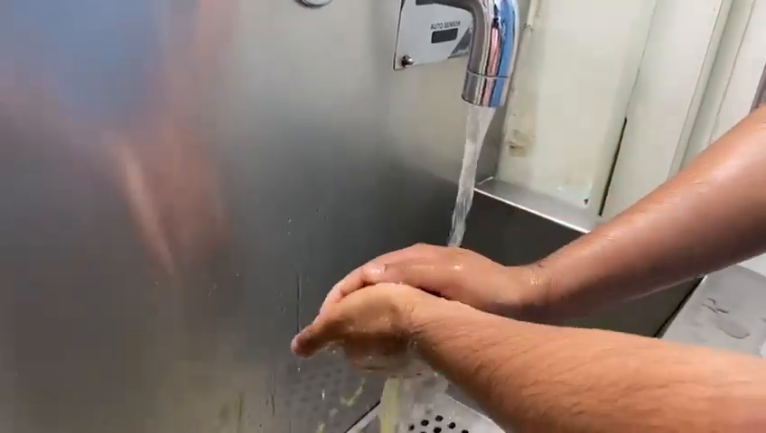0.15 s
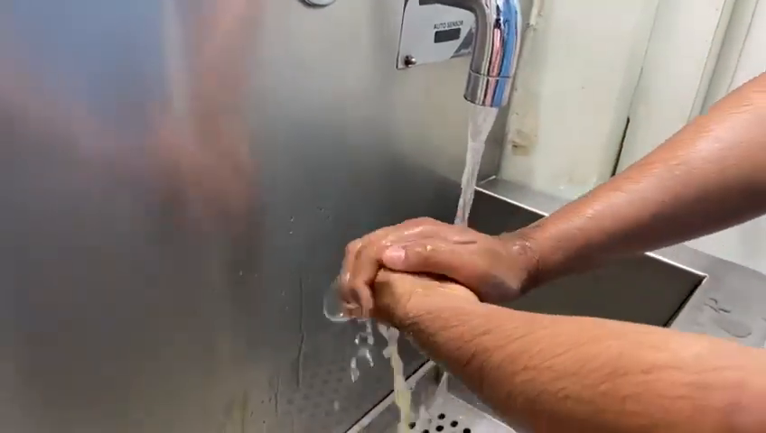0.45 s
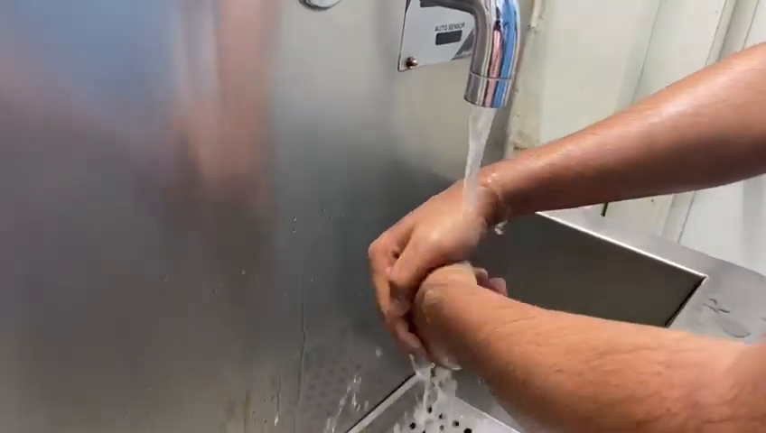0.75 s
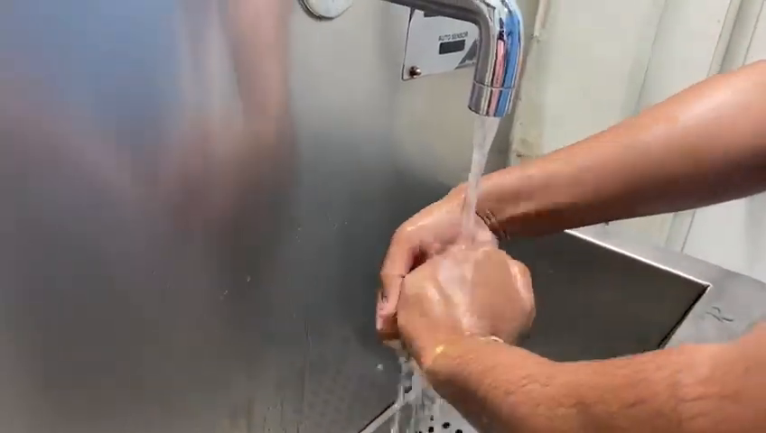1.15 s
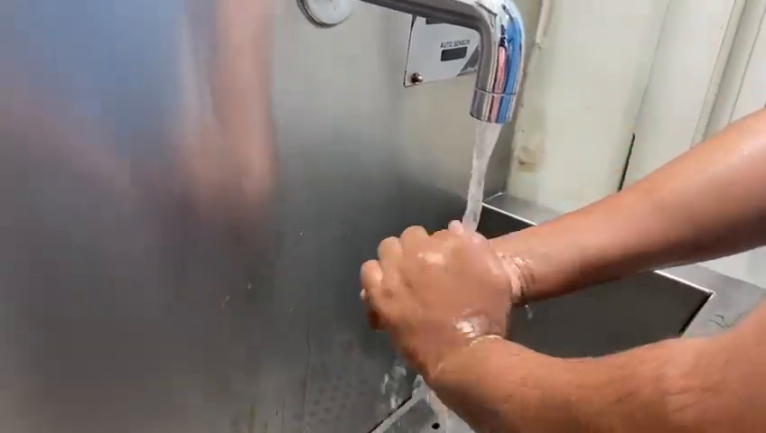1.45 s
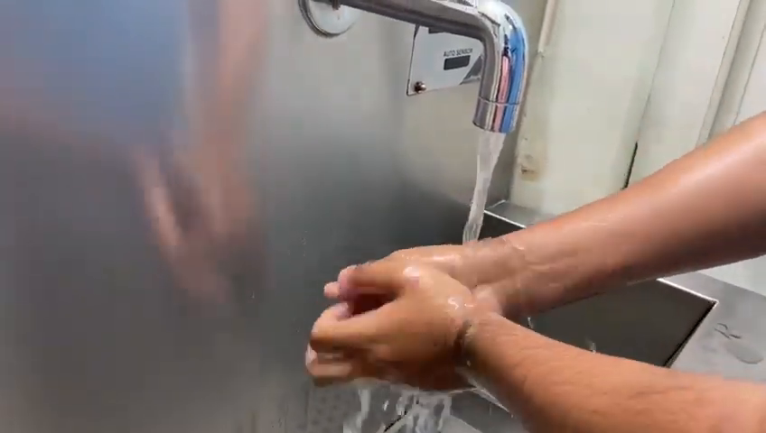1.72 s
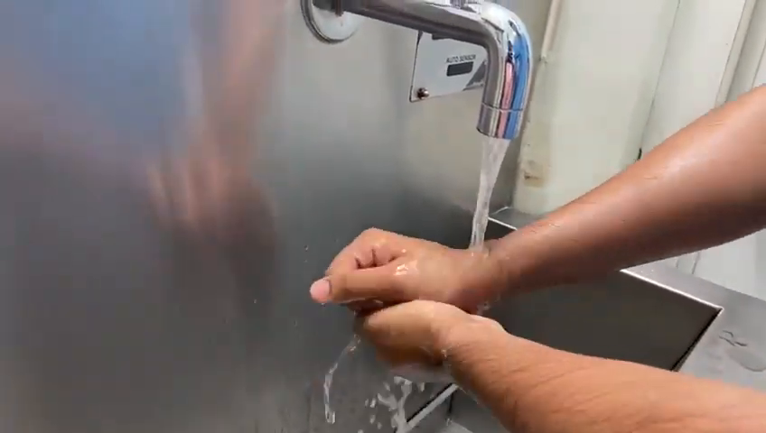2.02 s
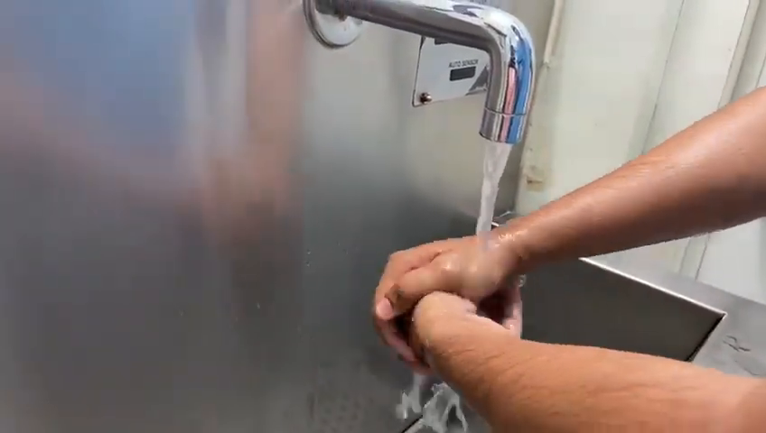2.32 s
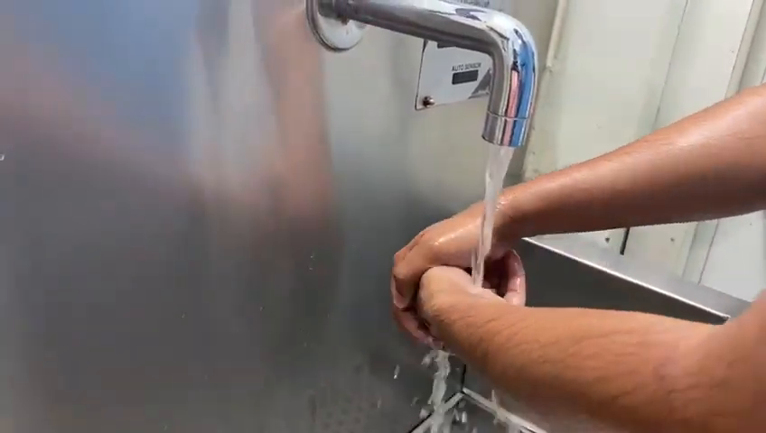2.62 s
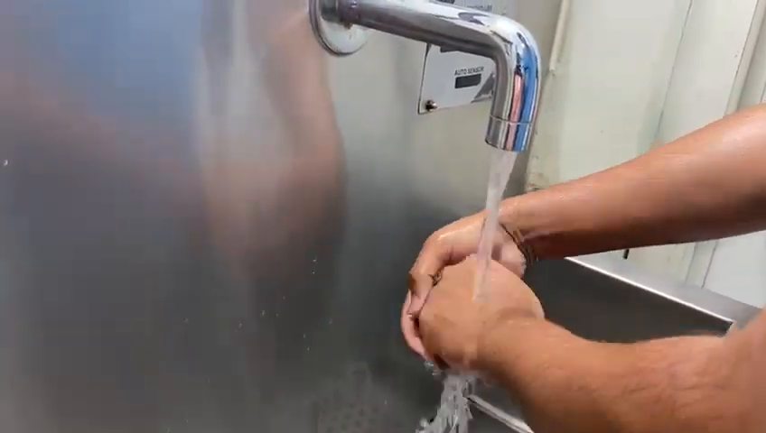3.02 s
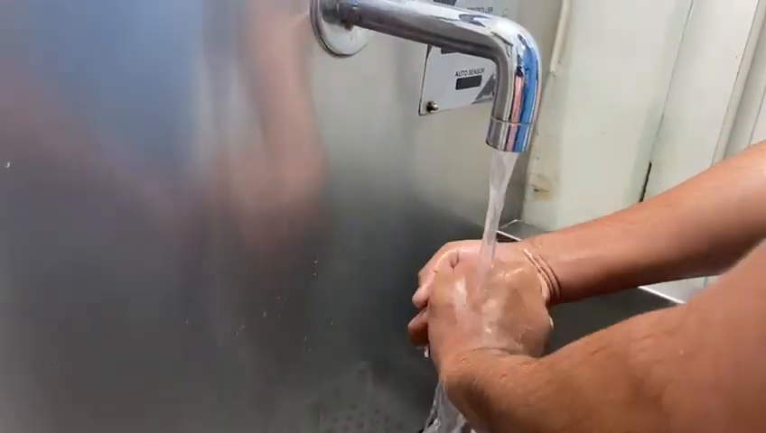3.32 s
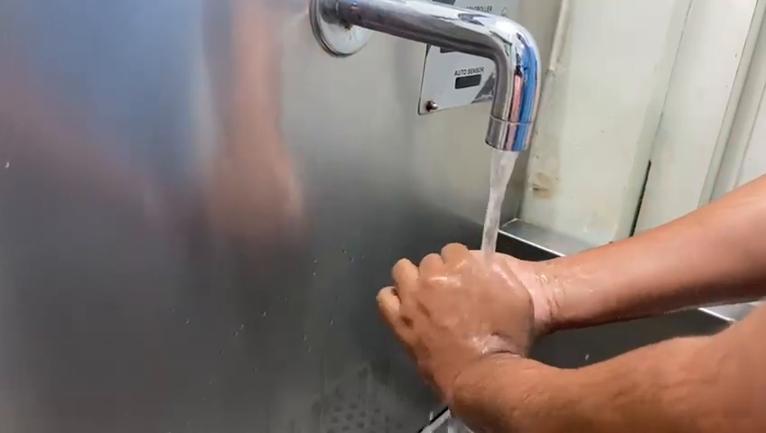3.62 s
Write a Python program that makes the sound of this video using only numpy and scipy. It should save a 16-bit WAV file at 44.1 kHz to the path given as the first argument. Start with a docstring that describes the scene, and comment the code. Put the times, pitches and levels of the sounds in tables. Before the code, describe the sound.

Running water hisses and splatters off washing hands into a low-humming metal basin indoors

```python
"""Tap water runs over rubbing hands and falls into a sheet-metal sink in a small hard room.
From the outset falling water drives the low basin modes into a hum, and noise bands give the hiss of spray.
Droplets tick and pop throughout as short resonances; from 0.04 s splashes off the hands add slap,
crackle and rising bubbles, the strongest near 1.76 s and the last near 3.7 s. The walls return droplets and
splashes as one echo and a diffuse tail; the sum is heard in stereo, one treble band almost only at the sides."""
import sys
import numpy as np
from scipy import signal
from scipy.fft import next_fast_len
from scipy.io import wavfile
from scipy.ndimage import uniform_filter1d

SR = 44100
rng = np.random.default_rng(int(sys.argv[2]) if len(sys.argv) > 2 else 0)


def unload_audio(sound):
    """Save the sound as a 16-bit wav file, at the path given as the first command line argument."""
    columns = np.transpose(np.atleast_2d(sound))
    # keep every value between -1 and 1, then stretch to whole-number steps
    steps = np.round(np.clip(columns, -1, 1) * 32767)
    wavfile.write(sys.argv[1], SR, steps.astype(np.int16))


N = 165816

# Water drumming the basin; mode groups shift as the landing spot moves: [t/s, drum level/dB, then
# level/dB relative to the drum for modes below 82 Hz, at 82-100 Hz, at 100-165 Hz and above 600 Hz]
DRUMMING = [(0.0, -32.5, -9, -14, 0, -6), (0.07, -29, -7, -14, -4, -25), (0.14, -32.5, -19, -1, -9.5, -15),
            (0.32, -26, -10, -8, -3.5, -17), (0.42, -29.5, -14, -16, -4, -13),
            (0.6, -26.5, -11, -11, -4.5, -9.5), (0.76, -28, -22, 3, -5.5, -13.5),
            (0.92, -29, -9, 0, -1, -11.5), (0.98, -34.5, -19, 7.5, 4.5, -4.5),
            (1.16, -28.5, -15, -3.5, -8, -15), (1.26, -32, -21, 0, -10, -24),
            (1.38, -35.5, -5.5, 1, -6.5, -9), (1.75, -33, -7.5, -4, 1.5, -9.5),
            (1.88, -29.5, -13, -15, -9, -16), (1.93, -35.5, -9, 2, 0, -9.5),
            (1.99, -28.5, -36, -38, -0.5, -14), (2.03, -30, -7, -2, -9, -12),
            (2.5, -31, -4.5, -4, 1.5, -10), (2.73, -28.5, -25, -8, -5.5, -12.5),
            (2.81, -30, -2, -4, -8, -13.5), (2.88, -30, -7, -2, -5, -5.5), (2.95, -29.5, -8, -15, 5, -12.5),
            (3.04, -30, -4, -39, 0, -7), (3.13, -28.5, -6, 4, -0.5, -8.5),
            (3.49, -30.5, -6, -15, -1.5, -10.5), (3.76, -31.5, -24, 2, -2.5, -15.5)]
# Modes near 330 Hz (290-380 Hz), which follow this instead of the drum level: [t/s, level/dB]
MIDDLE_MODES = [(0.0, -56), (0.03, -42), (0.16, -37.5), (0.58, -29), (0.86, -40.5), (0.87, -32.5),
                (1.42, -38.5), (1.51, -31), (1.56, -43.5), (1.89, -29.5), (1.93, -35.5), (2.78, -29),
                (2.85, -37), (3.06, -29.5), (3.69, -35), (3.76, -30)]
# Normal modes of the basin: [f/Hz, bandwidth/Hz, relative level/dB]
BASIN_MODES = [(76.03, 3.7, 12.5), (89.1, 5.4, 2.5), (135.3, 7.4, 6.5), (160.4, 3, 0.5), (182.3, 35, -14),
               (196.8, 12, -5), (234.6, 14, -4.5), (272.9, 8.1, -4), (320.3, 9.9, 1.5), (343.2, 9.8, 0.5),
               (361, 13.3, -7), (403.7, 33, -14.5), (453, 11.7, -9), (468, 55, -21.5), (500, 14.5, -16),
               (546, 14, -18), (626.7, 18.6, -6), (707, 81, -16), (874.6, 69, -12.5), (961, 23, -7),
               (1022, 32.5, -9), (1146, 52, -14), (1423, 60, -16), (1514, 67, -17), (1783, 20, -14.5)]
# Boundaries between the groups of modes: [f/Hz]
MODE_GROUP_EDGES = (82, 100, 165, 290, 380, 600)
# Spray thrown off as the hands turn, the reference for hiss and drops: [t/s, level/dB]
SPRAY_COURSE = [(0.0, -40.5), (0.47, -36.5), (0.58, -36), (0.7, -39), (0.83, -36.5), (0.94, -39),
                (1.13, -37), (1.36, -45.5), (1.48, -38), (1.81, -41), (2.15, -37), (2.71, -36.5),
                (2.84, -37), (3.09, -35), (3.33, -39.5), (3.51, -37), (3.76, -44)]
# Spectral density of the hiss, which also weights the drops: [f/Hz, relative level per Hz/dB]
SPRAY_SPECTRUM = [(30, 4), (55, 18.5), (110, -4), (250, 15), (500, 12.5), (800, 5.5), (1100, 1),
                  (1600, -9.5), (2400, -2.5), (4000, -2.5), (6300, -3), (8000, -3.5), (10500, -3.5),
                  (12500, -9)]
# Independent side noise of the hiss relative to its centre: [f/Hz, level/dB]
SPRAY_SIDE_SPECTRUM = [(30, -59), (150, -8), (400, -2.5), (800, 0.5), (1500, 6), (2500, -4), (4000, -25),
                       (5600, 2), (12500, -24)]
# Splashes off the hands: [t/s, reference level/dB, f/Hz, crackle decay time T60/s,
# left over right/dB, broad crackle relative to the reference level/dB]
HAND_SPLASHES = [(0.0441, -27.5, 2750, 0.12, 6, 1), (0.164, -28, 5430, 0.03, 3, -6),
                 (0.1941, -18, 2435, 0.06, 4.5, -6), (0.22, -22, 4130, 0.043, 12, -10),
                 (0.2305, -20.5, 3130, 0.05, 4, 1), (0.247, -30, 2580, 0.063, 4, 6),
                 (0.265, -27, 2600, 0.051, 5, 7), (0.341, -24.5, 5560, 0.15, 13, 1),
                 (0.353, -26.5, 2330, 0.062, 1, -5), (0.4762, -27, 2330, 0.052, -0.5, -10),
                 (0.4991, -19, 3360, 0.051, 7, -7), (0.5199, -20, 3930, 0.29, 4.5, 6.5),
                 (0.575, -30, 3840, 0.038, 3, 1), (0.604, -29, 2350, 0.04, 5, -16),
                 (0.6425, -31, 2380, 0.043, -1, 9), (0.6754, -25, 3680, 0.06, 4, -1),
                 (0.732, -32.5, 4100, 0.06, 5, 12), (0.7677, -25.5, 2600, 0.037, 6, 14.5),
                 (0.795, -31, 3650, 0.06, 20, -6), (0.8625, -22, 4000, 0.073, 5, 7),
                 (0.862, -25, 1516, 0.04, 2, 4), (0.88, -15.5, 7450, 0.033, -3, -12),
                 (0.9865, -13.5, 8540, 0.079, -4, -10), (1.0157, -34, 4860, 0.1, -1, 15),
                 (1.032, -24.5, 3000, 0.1, 6, 8), (1.295, -24, 2250, 0.064, 5, -0.5),
                 (1.295, -20, 3880, 0.11, 5, 8), (1.3398, -24, 4200, 0.21, 4, 7),
                 (1.351, -22, 6660, 0.056, 2, -6), (1.375, -23.5, 6900, 0.027, 4, -12),
                 (1.417, -18.5, 3560, 0.06, 2, -4.5), (1.442, -29, 4050, 0.04, 2, 9),
                 (1.453, -26.5, 7400, 0.05, -2, -4), (1.5257, -21.5, 3690, 0.039, -1, -3),
                 (1.584, -19, 3810, 0.04, 6, -1.5), (1.555, -30.5, 4550, 0.087, 7, 16.5),
                 (1.614, -28, 5470, 0.03, 2, -9), (1.67, -21.5, 4840, 0.076, 0, -2),
                 (1.7563, -8, 4080, 0.068, 7.5, 0), (1.766, -23, 4050, 0.07, -3, -2),
                 (1.7958, -15, 6000, 0.046, 9, -8), (1.8185, -26, 4050, 0.05, 2, -9),
                 (1.909, -30, 2780, 0.045, 5.5, -1), (1.9438, -26, 2320, 0.046, 5, 6),
                 (1.953, -18.5, 5120, 0.04, 2, 2), (2.0443, -24, 7300, 0.08, -2, 2),
                 (2.0648, -26.5, 3900, 0.064, 0, 8), (2.0969, -25.5, 2440, 0.047, 0.5, 13.5),
                 (2.249, -21, 6700, 0.074, 3, -13), (2.294, -27, 3500, 0.073, 7, -2),
                 (2.335, -27, 4850, 0.044, -1, 9), (2.368, -25.5, 7100, 0.043, 0, 6.5),
                 (2.386, -28.5, 3650, 0.081, 2.0, 13), (2.411, -28, 3130, 0.042, 10, 7),
                 (2.4327, -19.5, 3440, 0.051, 4, 4.5), (2.5272, -24, 4600, 0.036, -1, -27),
                 (2.6498, -15.5, 3920, 0.04, 3, 1.5), (2.6883, -19, 4670, 0.053, 3, -18),
                 (2.729, -23.5, 3920, 0.052, 4, 3), (2.806, -11.5, 4480, 0.045, 6.5, -1),
                 (2.8811, -17, 2210, 0.043, 7, 1.5), (2.889, -14.5, 2550, 0.062, 5, -4),
                 (2.903, -24, 2520, 0.083, 3, -20), (2.947, -20.5, 5850, 0.04, 5, 4.5),
                 (3.0043, -10.5, 5780, 0.026, -2, -3), (3.045, -30, 4270, 0.052, 2, 4),
                 (3.1105, -23, 4960, 0.017, 0, 2), (3.1232, -24, 5100, 0.017, 0.5, 0),
                 (3.1396, -19, 5350, 0.023, -3, 0), (3.1589, -20, 3820, 0.085, 5, 0),
                 (3.189, -15.5, 3570, 0.065, 1.5, -38), (3.2403, -21.5, 5100, 0.032, 5, 3),
                 (3.3673, -27.5, 4300, 0.092, 8.5, 7.5), (3.478, -22, 2820, 0.028, 2, -1),
                 (3.5672, -29, 6800, 0.037, 9, 13.5), (3.7031, -15.5, 4350, 0.1, 3, -4.5)]

# basin: each mode swells on its own; side share is halved at BASIN_SIDE_HZ and opens above it
BASIN_SWAY_DB, BASIN_SIDE_DB, BASIN_SIDE_HZ, BASIN_LEFT = 1.54, -7.5, 477, 0.41
# exponent of power smoothing that reduces the beating of modes below this frequency
HUM_EVEN, HUM_EVEN_HZ = 0.55, 400
# spray: offset from its course, flicker depth from 1500 Hz up, leftward share from 600 Hz up
SPRAY_OFFSET_DB, SPRAY_FLICKER_DB, SPRAY_LEFT = -4, 4, 0.1
# ringing drops, then drops that only tick: typical rate, offset from the spray course, quality factor
DROPS_PER_S, DROP_OFFSET_DB, DROP_Q = 450, -8.5, 36
TICKS_PER_S, TICK_OFFSET_DB, TICK_Q = 110, -9, 2.2
DROP_SPREAD_DB = 3.4
# splash noise: sharpness, impact rate, onset; crackle band in multiples of the splash frequency
SPLASH_Q, SPLASH_GRAINS_PER_S, SPLASH_ATTACK_S = 8.5, 6700, 0.0017
CRACKLE_LOW, CRACKLE_HIGH = 0.55, 2.63
# the slap dies fast; the crackle starts below it and goes on
SLAP_T60_S, TAIL_DB = 0.014, -8
# bubbles per splash, their level, cycles per 20 dB of decay, and log-frequency spread of the later ones
BUBBLES, BUBBLE_DB, BUBBLE_CYCLES, BUBBLE_SCATTER = 7, 4.5, 9.8, 0.238
# fractional rise in frequency per cycle, first and later; level of later bubbles against the first
FIRST_RISE, LATE_RISE, LATE_BUBBLE_DB = 0.039, 0.0177, -12.5
# diffuse tail, then the first echo off the far wall of the basin
ROOM_T60_S, ROOM_DB, WALL_CUT_HZ = 0.28, -5.5, 2100
WALL_ECHO_S, WALL_ECHO_DB = 0.0098, -10
# stereo: band heard at the sides, not the centre; low-pass of the other side sound; the two top cuts
SIDE_BAND_LOW_HZ, SIDE_BAND_HIGH_HZ, SIDE_FADES_HZ = 8115, 9790, 6100
ROLL_OFF_HZ, CUTOFF_HZ = 13000, 12680


def from_db(db):
    """Convert a level in decibels to an amplitude ratio."""
    return 10 ** (np.asarray(db) / 20)


def rms_one(x):
    """Normalise to unit root-mean-square amplitude."""
    return x / np.sqrt(np.mean(x ** 2) + 1e-20)


def at_hz(points, hz):
    """Interpolate a spectrum linearly in level on a logarithmic frequency axis."""
    f, level_db = np.array(points).T
    return np.interp(np.log(hz), np.log(f), level_db)


def in_time(rows):
    """Interpolate each column of a time table linearly, sample by sample."""
    s, *columns = np.transpose(rows)
    return [np.interp(np.arange(N) / SR, s, column) for column in columns]


def drift(rate_hz):
    """Low-pass noise: two equal poles at rate_hz leave a slow fluctuation of unit rms."""
    step = 40   # samples between computed values
    r = np.exp(-2 * np.pi * step * rate_hz / SR)
    noise = rng.standard_normal(N // step + 2002)
    slow = signal.lfilter([1], [1, -2 * r, r * r], noise)[2000:]   # discard the start-up
    return np.interp(np.arange(N) / step, np.arange(len(slow)), rms_one(slow))


def resonate(x, hz, width_hz):
    """Two-pole resonance: pole radius sets the bandwidth, with near-unit gain at the peak."""
    r = np.exp(-np.pi * width_hz / SR)
    zeros = [(1 - r * r) / 2, 0, (r * r - 1) / 2]
    poles = [1, -2 * r * np.cos(2 * np.pi * hz / SR), r * r]
    return signal.lfilter(zeros, poles, x)


def band(x, low_hz, high_hz):
    """Butterworth band-pass: maximally flat between its two edges."""
    return signal.sosfilt(signal.butter(2, [low_hz, high_hz], "band", fs=SR, output="sos"), x)


def left_right(mid, side):
    """Sum and difference of centre and side signals give the two channels."""
    return np.array([mid + side, mid - side])


def basin(level_db, group_db):
    """Modal superposition: dense impacts act as noise forcing and keep every basin mode ringing."""
    mid, side, run_in = 0, 0, SR // 4
    for hz, width_hz, db in BASIN_MODES:
        forcing = rng.standard_normal((2, N + run_in))
        # two resonances in cascade, each wider, give the listed bandwidth together
        ringing = resonate(resonate(forcing, hz, width_hz * 1.5), hz, width_hz * 1.5)
        shared, apart = ringing[:, run_in:]
        if hz < HUM_EVEN_HZ:
            power = uniform_filter1d(shared ** 2, int(3 * SR / hz))   # mean over three periods
            shared = shared * (power / power.mean() + .02) ** (-HUM_EVEN / 2)
        group = np.searchsorted(MODE_GROUP_EDGES, hz)
        gain = from_db(db + BASIN_SWAY_DB * drift(3.8) + group_db[group])
        lean = BASIN_LEFT * np.clip(np.log2(hz / 380), 0, 1)
        opening = from_db(BASIN_SIDE_DB) / (1 + (BASIN_SIDE_HZ / hz) ** 2)
        mid = mid + gain * shared
        side = side + gain * (lean * shared + opening * apart)
    return from_db(level_db) * left_right(mid, side) / np.std(band(mid, 170, 600))


def spray(level_db):
    """Band-filtered noise: third-octave bands flicker partly together and lean a little to the left."""
    mid, side = 0, 0
    edges = 30 * 2 ** np.arange(0, 8.9, 1 / 3)
    white = rng.standard_normal((2, 2, N))   # neighbouring bands take alternate sources
    gust, spatter = drift(19), drift(54)
    for k, (low, high) in enumerate(zip(edges, edges[1:])):
        shared, apart = band(white[k % 2], low, high)
        hz = np.sqrt(low * high)
        flicker = 0.51 * gust + 0.51 * spatter + 0.82 * drift(9.5)
        depth_db = SPRAY_FLICKER_DB * min(1, hz / 1500)
        gain = from_db(at_hz(SPRAY_SPECTRUM, hz) + depth_db * flicker)
        lean = SPRAY_LEFT * min(1, hz / 600)
        mid = mid + gain * shared
        side = side + gain * (from_db(at_hz(SPRAY_SIDE_SPECTRUM, hz)) * apart + lean * shared)
    return from_db(level_db + SPRAY_OFFSET_DB) * left_right(mid, side) / np.std(band(mid, 2000, 8000))


def droplets(level_db, per_s, q):
    """Impulse response: random, clumped impacts each ring a resonance whose Q sets the decay in cycles."""
    sizes = from_db(DROP_SPREAD_DB * np.minimum(rng.exponential(1, N), 4)) * rng.choice([-1, 1], N)
    born = rng.random(N) < per_s * from_db(3 * drift(12)) / SR
    dealt = rng.integers(0, 20, N)   # which of the 20 pitches each drop takes
    pops = 0
    for k, hz in enumerate(np.geomspace(1200, 11500, 20)):
        impacts = sizes * born * (dealt == k) + 1e-18
        width_hz = hz / q
        pops = pops + from_db(at_hz(SPRAY_SPECTRUM, hz)) * resonate(impacts, hz, width_hz) / np.sqrt(width_hz)
    return from_db(level_db) * rms_one(pops)


def rising_bubbles(t, hz, t60):
    """Bubble oscillation: decaying sines rise in frequency, one at once and weaker ones later."""
    late = np.append(0, rng.uniform(0.13 * t60, 0.36 * t60, BUBBLES - 1))[:, None]
    first = late == 0
    detune = np.where(first, -0.1, BUBBLE_SCATTER * rng.standard_normal((BUBBLES, 1)))
    cycles = np.maximum(t - late, 0) * hz * np.exp(detune)
    late_db = LATE_BUBBLE_DB - 40 * late / t60 + 5.6 * rng.standard_normal((BUBBLES, 1))
    strength = np.where(first, 1, from_db(late_db))
    rise = np.where(first, FIRST_RISE, LATE_RISE)
    phase = 2 * np.pi * cycles * (1 + rise * np.minimum(cycles, 30) / 2)
    decay = from_db(-60 * cycles / (3 * BUBBLE_CYCLES))
    return np.sum(strength * decay * np.sin(phase), axis=0)


def splashes():
    """Transient excitation: a fast-decaying slap and slower crackle of grains accompany rising bubbles."""
    out, size = np.zeros((2, N + SR)), SR // 4
    t = np.arange(size) / SR
    for s, db, hz, t60, pan_db, broad_db in HAND_SPLASHES:
        impacts = (rng.random(size) < SPLASH_GRAINS_PER_S / SR) * rng.standard_normal(size)
        grains = impacts + 0.12 * rng.standard_normal(size)
        grains = grains * (from_db(-60 * t / SLAP_T60_S) + from_db(TAIL_DB - 60 * t / t60))
        tuned = resonate(grains, hz, hz / SPLASH_Q)
        broad = band(grains, hz * CRACKLE_LOW, min(hz * CRACKLE_HIGH, 12000))
        parts = [(tuned, -4), (broad, broad_db), (rising_bubbles(t, hz, t60), BUBBLE_DB)]
        burst = sum(from_db(part_db) * part / np.abs(part).max() for part, part_db in parts)
        burst = burst * np.clip(t / SPLASH_ATTACK_S, 0, 1)
        start = int(s * SR)
        out[:, start:start + size] += from_db(db + pan_db / 2 * np.array([[1], [-1]])) * burst
    return out[:, :N]


def room(x):
    """Reverberation: convolution with one early echo and a dull, exponentially decaying tail per side."""
    t = np.arange(int(ROOM_T60_S * SR)) / SR
    tail = rng.standard_normal((2, len(t))) * from_db(-60 * t / ROOM_T60_S)
    tail = tail * np.clip(t / 0.0092, 0, 1)   # gradual build-up
    tail = signal.sosfilt(signal.butter(1, WALL_CUT_HZ, fs=SR, output="sos"), tail)
    tail = from_db(ROOM_DB) * tail / np.sqrt(np.sum(tail[0] ** 2))
    tail[:, int(WALL_ECHO_S * SR)] += from_db(WALL_ECHO_DB)
    return signal.fftconvolve(x[None], tail, axes=1)[:, :N]


def scene():
    """Linear superposition of hum, spray, droplets and splashes, the last two returned by the walls."""
    drum_db, below_82, to_100, to_165, above_600 = in_time(DRUMMING)
    spray_db, = in_time(SPRAY_COURSE)
    middle_db, = in_time(MIDDLE_MODES)
    hum = basin(drum_db, [below_82, to_100, to_165, 0, middle_db - drum_db, 0, above_600])
    hiss = spray(spray_db)
    drops = droplets(spray_db + DROP_OFFSET_DB, DROPS_PER_S, DROP_Q)
    drops = drops + droplets(spray_db + TICK_OFFSET_DB, TICKS_PER_S, TICK_Q)
    near = splashes() + drops * from_db([[.8], [-.8]])   # drops a little to the left
    return hum + hiss + near + room(near.mean(axis=0))


def record(dry):
    """Stereo shaping: one treble band leaves the centre and is heard at the sides; the top is cut."""
    mid, side = (dry[0] + dry[1]) / 2, (dry[0] - dry[1]) / 2
    notch = signal.butter(4, [SIDE_BAND_LOW_HZ, SIDE_BAND_HIGH_HZ], "bandstop", fs=SR, output="sos")
    centre = signal.sosfiltfilt(notch, mid) + from_db(-34.5) * mid
    wider = signal.butter(3, [SIDE_BAND_LOW_HZ - 500, SIDE_BAND_HIGH_HZ + 800], "band", fs=SR, output="sos")
    side_band = signal.sosfiltfilt(wider, mid)
    turned = signal.hilbert(side_band, next_fast_len(N)).imag[:N]   # quarter-cycle phase shift
    low_side = signal.sosfiltfilt(signal.butter(5, SIDE_FADES_HZ, fs=SR, output="sos"), side)
    out = left_right(centre, low_side + from_db(-2.5) * turned)
    out = signal.sosfilt(signal.cheby1(8, .5, ROLL_OFF_HZ, fs=SR, output="sos"), out)
    return signal.sosfilt(signal.cheby2(16, 70, CUTOFF_HZ, fs=SR, output="sos"), out)


dry = scene()
out = record(dry)
unload_audio(out)
```